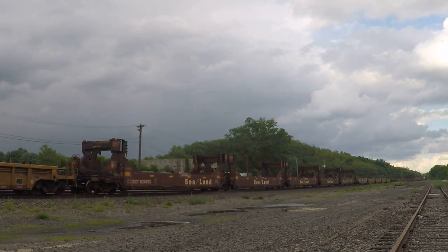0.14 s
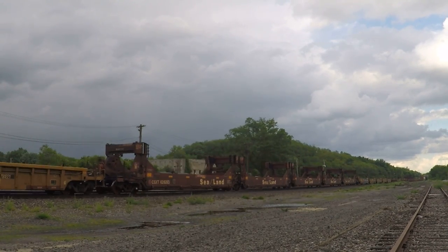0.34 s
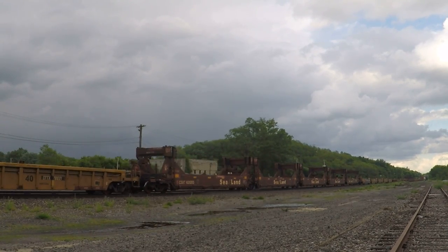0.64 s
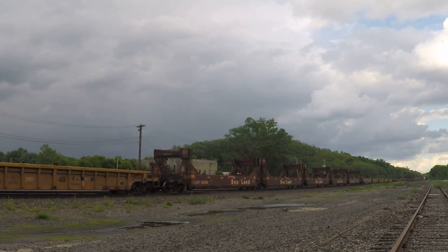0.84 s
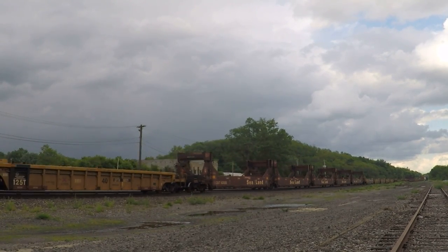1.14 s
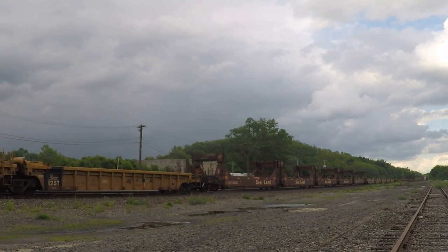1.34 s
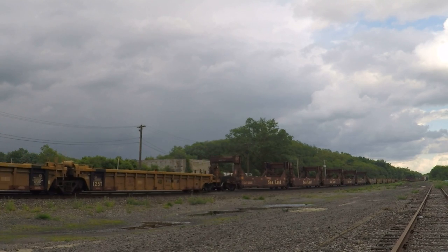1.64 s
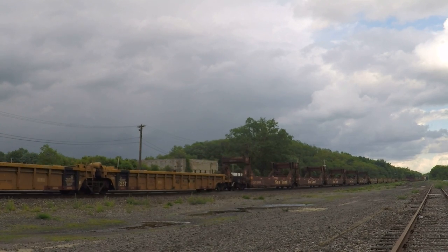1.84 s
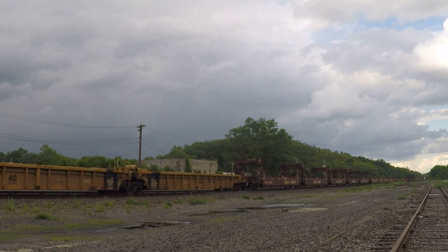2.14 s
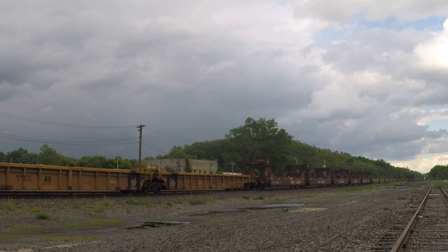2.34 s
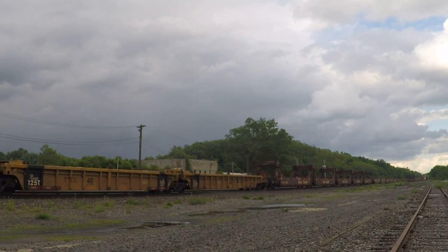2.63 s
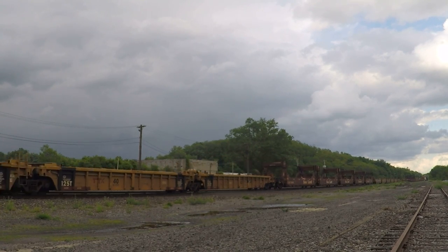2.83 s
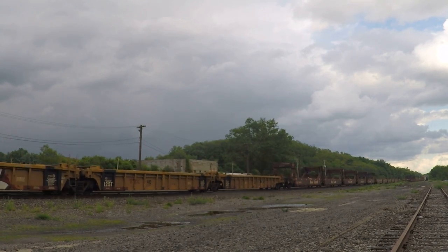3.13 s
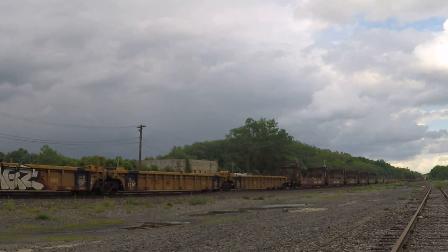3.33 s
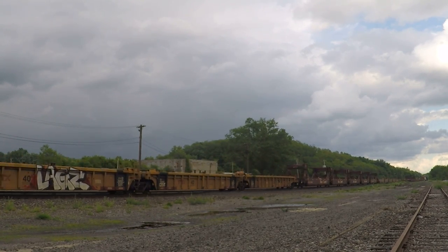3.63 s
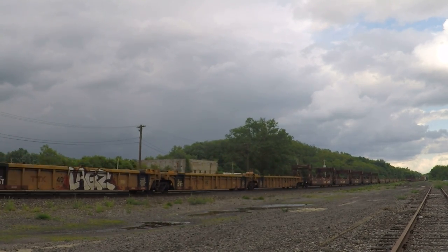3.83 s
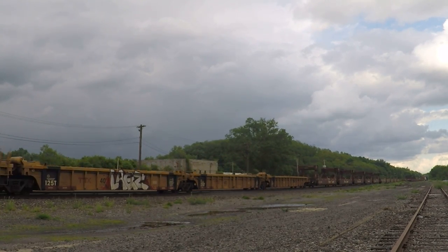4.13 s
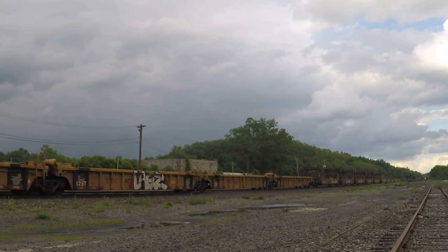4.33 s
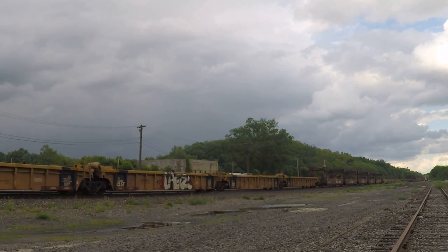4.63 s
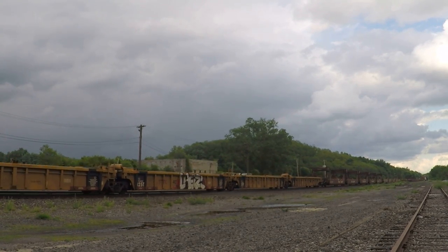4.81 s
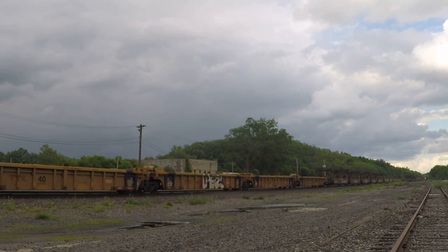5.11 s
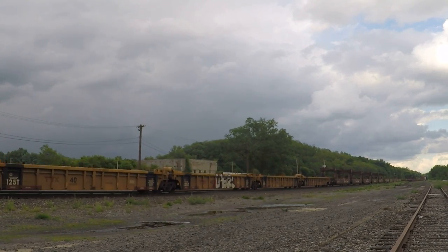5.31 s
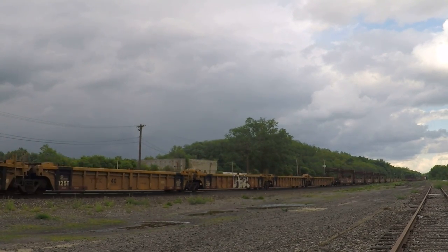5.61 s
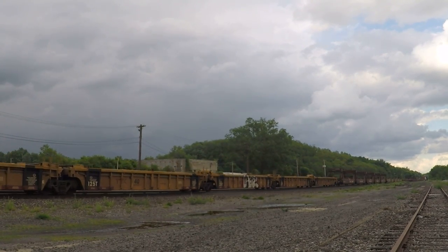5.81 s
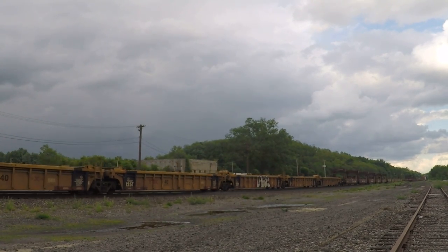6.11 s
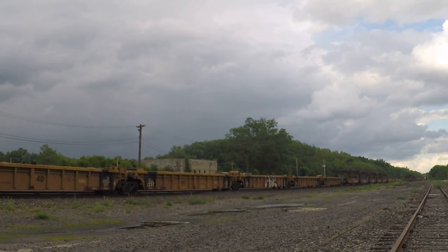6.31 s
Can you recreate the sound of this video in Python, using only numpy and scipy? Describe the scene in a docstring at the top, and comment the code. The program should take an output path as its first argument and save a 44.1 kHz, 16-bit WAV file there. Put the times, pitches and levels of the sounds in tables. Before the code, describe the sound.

A passing freight train rumbles and sings on its rails, clanking over joints, squeaking once per wheel turn, with deep wind buffets and hollow booms.

```python
"""A freight train of empty cars rolls past across an open gravel yard.
From the start the bodies rumble, wheels hiss and sing as narrow resonances, and struck steel modes clank.
From 0.7 s one wheel squeaks once a turn, every 1.4 s, as gliding tones with an octave in a noisy scrape.
At 2.1 s a gust surges: shaped noise and decaying swings thud on the microphone, and recur later.
From 4 s the clanks return, hardest at 4.7 s; the panel drone swells and low booms cluster near 5.6 s."""
import sys
import numpy as np
from scipy import signal
from scipy.fft import rfft, irfft
from scipy.io import wavfile

SR = 44100
rng = np.random.default_rng(int(sys.argv[2]) if len(sys.argv) > 2 else 0)


def waveform_to_disk(signal):
    """Save audio, clipped to [-1, 1], as 16-bit WAV at the path in sys.argv[1]."""
    frames = np.transpose(np.atleast_2d(signal))
    scaled = np.clip(frames, -1, 1) * 32767
    samples = np.round(scaled).astype(np.int16)
    wavfile.write(sys.argv[1], SR, samples)


N = 284886


def from_db(db):
    """dB to gain."""
    return 10 ** (np.asarray(db) / 20)


def rms_one(x):
    """Scaled to rms 1."""
    return x / np.sqrt(np.mean(x ** 2) + 1e-20)


def level_curve(rows):
    """Breakpoints (time_s, level_db) as one level per sample."""
    time_s, level_db = np.transpose(rows)
    return np.interp(np.arange(N) / SR, time_s, level_db)


def bump(centre_s, half_width_s):
    """Gaussian swell of height 1, down to 1/e at the half width."""
    return np.exp(-((np.arange(N) / SR - centre_s) / half_width_s) ** 2)


def plateau(start_s, lasts_s):
    """Flat-topped swell of height 1 with soft edges."""
    half_s = lasts_s / 2
    return np.exp(-((np.arange(N) / SR - start_s - half_s) / half_s) ** 4)


def drift(rate_hz):
    """Slow chance with spread 1: noise through two equal poles, at every 40th sample."""
    r = np.exp(-80 * np.pi * rate_hz / SR)
    slow = signal.lfilter([1], [1, -2 * r, r * r], rng.standard_normal(N // 40 + 2002))
    slow = rms_one(slow[2000:])  # drop the run-in
    return np.interp(np.arange(N) / 40, np.arange(len(slow)), slow)


def coloured(spectrum):
    """Noise with a spectrum drawn over log frequency, rms 1."""
    hz, level_db = np.transpose(spectrum)
    grid_hz = np.arange(N // 2 + 1) * SR / N + 1
    shape_db = np.interp(np.log(grid_hz), np.log(hz), level_db, left=-90, right=-90)
    return rms_one(irfft(rfft(rng.standard_normal(N)) * from_db(shape_db), N))


def resonate(x, hz, width_hz):
    """One two-pole resonance with gain 1 on top."""
    r = np.exp(-np.pi * width_hz / SR)
    poles = [1, -2 * r * np.cos(2 * np.pi * hz / SR), r * r]
    return signal.lfilter([(1 - r * r) / 2, 0, (r * r - 1) / 2], poles, x)


def narrow_noise(hz, width_hz):
    """Noise twice through one resonance, rms 1."""
    once = resonate(rng.standard_normal(N), hz, width_hz)
    return rms_one(resonate(once, hz, width_hz))


def wavering_tone(hz, width_hz):
    """A tone that wanders in pitch and flutters in level, rms 1."""
    phase = 2 * np.pi * np.cumsum(hz + 0.12 * width_hz * drift(6)) / SR
    return rms_one(from_db(2 * drift(14)) * np.sin(phase))


def rumble():
    """Rough treads shake the empty bodies: low noise, two resonances that come and go, a panel drone."""
    # body rumble level: time_s, level_db
    shaking = [(0.0, -39), (1.04, -41.5), (2.05, -39.5), (2.19, -33.5), (2.25, -42), (2.36, -40),
               (3.97, -40.5), (4.75, -38.5), (5.42, -39), (5.58, -38), (5.65, -41.5), (6.46, -39.5)]
    # rumble spectrum: freq_hz, density_db (relative, per Hz)
    rumble_spectrum = [(110, 2), (160, 5), (250, -0.5), (315, 0), (400, -9.5), (480, -11.5), (600, -21.5),
                       (800, -60)]
    # car-body resonances: freq_hz, width_hz (each pass), level_db (re rumble noise)
    body_modes = [(196.6, 43.6, -8), (397.7, 48, -11)]
    # side-panel drone level: time_s, level_db
    drone_curve = [(0, -47.5), (1.1, -57.5), (1.6, -59), (2.65, -55), (2.76, -44), (2.9, -54), (3.05, -64),
                   (3.25, -48), (3.4, -44.5), (4.1, -47.5), (4.27, -48), (4.5, -41.5), (4.72, -42.5),
                   (4.98, -41.5), (5.25, -47.5), (5.6, -48.5), (6.0, -43), (6.46, -57)]

    panels = sum(from_db(db + 2.0 * drift(3.2)) * narrow_noise(hz, width_hz)
                 for hz, width_hz, db in body_modes)
    body = rms_one(coloured(rumble_spectrum) + panels)
    body_db = level_curve(shaking) + 1.5 * drift(6.2)
    drone_db = level_curve(drone_curve) + 1.5 * drift(3.4)
    return from_db(body_db) * body + from_db(drone_db) * narrow_noise(311.0, 89.0)


def floors():
    """Car floors drum deeply: low noise plus a resonance at 107 Hz."""
    # drumming level: time_s, level_db
    drumming = [(0.0, -46), (0.29, -31), (0.47, -43), (0.56, -26.5), (0.66, -43), (1.04, -38.5),
                (1.26, -49), (1.29, -36), (2.25, -32), (3.9, -39.5), (4.16, -26), (4.19, -37.5),
                (4.64, -30), (4.71, -38), (5.38, -37.5), (5.61, -27.5), (5.78, -33), (6.46, -38)]
    # drumming spectrum: freq_hz, density_db (relative, per Hz)
    floor_spectrum = [(45, -3.5), (72, -3.5), (105, 2.5), (125, -15.5), (170, -36)]
    drum = rms_one(coloured(floor_spectrum) + 0.6 * narrow_noise(107, 30))
    return from_db(level_curve(drumming) + drift(4.5)) * drum


def rolling():
    """Steel on steel hisses unevenly; wheel and rail resonances stand out of it."""
    # rolling hiss level: time_s, level_db
    roll = [(0.0, -50), (0.52, -51), (1.89, -51.5), (2.07, -50.5), (3.04, -50.5), (3.62, -52), (4.26, -50),
            (4.51, -52.5), (4.79, -51.5), (5.34, -49.5), (6.13, -51), (6.46, -50)]
    # hiss spectrum: freq_hz, density_db (relative, per Hz)
    hiss_spectrum = [(500, -3), (770, -3), (1100, 2.5), (1290, 1.5), (1700, 4), (2000, 1), (2070, -13),
                     (2150, 2), (2500, 1), (2790, 6.5), (2860, -9), (3050, -3), (3140, 4), (3250, 4),
                     (3900, 1.5), (4120, -5), (5400, -11), (6400, -14), (8500, -26.5)]
    # resonances that swell as a car passes: freq_hz, width_hz, level_db, peak_s, half_width_s
    singing = [(1110, 110, -62, .3, .6), (1120, 110, -64, 3.5, 2.5), (1445, 60, -60, 1.9, .9),
               (1420, 120, -61, 5.3, 1.2), (1545, 60, -62, .7, .7), (1450, 90, -62, .5, .7),
               (1970, 70, -62, .6, 1.2), (2070, 90, -64, 5, 2), (1900, 60, -63, 2.6, .5),
               (2380, 100, -63, 4.95, .4), (2380, 200, -62, 3.5, 2), (2710, 60, -62, 6.2, .5),
               (3240, 130, -55.5, .06, .16), (3230, 90, -60, 1.8, .7), (3420, 160, -61, 5.5, .8),
               (3720, 150, -60, 4.5, 1.5), (4420, 200, -70, 2, 4), (1777, 20, -58, 5.42, .2),
               (1777, 20, -64, 5.85, .3), (1777, 25, -64, 4.85, .1), (2912, 18, -61, 5.27, .12),
               (3735, 28, -62, 4.3, .25), (3735, 40, -63, 3.95, .2), (1447, 30, -61, 1.55, .1),
               (3880, 130, -62, .6, 1), (5020, 20, -76, 2.2, .25), (2710, 25, -59.5, .55, .3),
               (2575, 25, -59, 2.87, .08), (2765, 30, -61, 3.25, .08), (2720, 30, -59, 3.38, .06),
               (2740, 30, -60, 3.08, .04), (2710, 40, -62, 4.1, .25), (2912, 18, -61, 5.7, .12),
               (2700, 25, -62, 5.55, .12), (3440, 25, -63, 4.66, .12), (3200, 30, -62, 6.36, .1),
               (3215, 40, -60, 5.13, .08), (3030, 120, -65, 3.8, .6), (3200, 30, -61, 2.9, .1),
               (3250, 25, -64, 1.62, .15), (3740, 30, -63, 3.05, .12), (3195, 50, -62, 2.7, .5),
               (2790, 40, -63, 2.25, .25), (3260, 80, -61, .8, .6), (3250, 30, -58, .07, .1),
               (3275, 25, -62, .45, .12), (2930, 250, -60.5, 5.6, 1.5), (2740, 70, -60, 3.2, .3),
               (1440, 90, -63, 3, .8), (2750, 30, -59, 1.68, .03), (2750, 30, -57.5, 1.84, .035),
               (2750, 40, -62, 1.52, .08), (2705, 16, -57.5, 3.17, .1), (3820, 25, -62, 4.4, .12),
               (3160, 40, -63, 5.28, .12)]
    # thin wheel modes that light up at random: freq_hz
    wheel_hz = [4360, 4420, 4480, 4650, 4870, 4950, 5040, 5200, 5260, 5530, 5650, 5930, 6080, 6260, 6400,
                6680, 6950, 7150]
    tone_under_hz = 32  # narrower resonances sing as a wavering tone

    roll_db = level_curve(roll)
    out = from_db(roll_db + 0.68 * drift(14.4) + 0.74 * drift(58)) * coloured(hiss_spectrum)
    for hz, width_hz, db, peak_s, half_width_s in singing:
        voice = wavering_tone if width_hz < tone_under_hz else narrow_noise
        flicker_db = 2.0 * min(half_width_s, 1) * drift(3.7)
        out += from_db(db + flicker_db) * bump(peak_s, half_width_s) * voice(hz, width_hz)

    hiss_hz, hiss_db = np.transpose(hiss_spectrum)
    for hz in wheel_hz:  # each follows the hiss level around it
        level_db = roll_db - 20 + np.interp(hz, hiss_hz, hiss_db) + 4 * drift(2.5)
        out += from_db(level_db) * narrow_noise(hz, 36)
    return out


def clanks():
    """Wheels over joints: each blow is uneven knocks into the steel's modes plus a dry noise crack."""
    # blows: start_s, level_db (before 6 dB trim), mid_db (500-900 Hz modes), lean_db (towards 717 Hz),
    # bright_db (modes over 900 Hz), top_db (extra over 2200 Hz), t60_s (scaled per mode and for the crack)
    blows = [(.177, -32, -4, 6, -2, -10, 0.11), (.529, -36, -4.5, -12.5, -10, -2, 0.033),
             (0.855, -42, -1, 0, -12, 0, 0.046), (1.17, -38, -3, 4.5, 0, -3, 0.067),
             (1.328, -52, -1, 14, -8, 0, .05), (2.144, -32, 1, -7, -5, -8, 0.031),
             (2.181, -41, -1, -10, -18, 0, 0.058), (2.522, -33.5, -2, -10, -28, 0, 0.047),
             (2.742, -40, 2, -4, -8, 0, 0.053), (4.085, -43, -3, -1, 4, -1, 0.36),
             (4.131, -45, -3, 3, 7, 0, 0.1), (4.7, -22.5, -6, 2, -3, 0, 0.06),
             (5.515, -53, -2, 8, -11, 2, 0.044), (5.557, -43, 0.5, 7.5, -11, 0, 0.1),
             (5.597, -45, 4, -8, -14, 3, 0.058), (5.62, -48, 7, 4, -17, 0, 0.046),
             (6.032, -30.5, -4, 9, 2.5, -7, 0.11), (6.304, -34, -4.5, 1, 3, -11, 0.084)]
    # modes of struck rail and truck: freq_hz, level_db, t60_share (ratio to the blow's)
    steel_modes = [(344, -4, 2.7), (429, 1.5, 0.7), (549, 0.5, 0.86), (717, -3.5, 0.61), (817, -15, 1.2),
                   (963, -11, 0.44), (1370, -31, 0.42), (1690, -11, 0.78), (1863, -12.5, 0.62),
                   (2090, -20, .8), (2295, -8.5, 0.76), (2440, -5, 0.47)]
    knock_decay_s, crack_hold_s, crack_attack_s = 0.005, 0.005, 0.001

    out, length = np.zeros(N + SR), SR // 3
    t = np.arange(length) / SR
    hz, mode_db, t60_share = np.transpose(steel_modes)[:, :, None]
    low = signal.butter(3, [420, 950], "band", fs=SR, output="sos")
    high = signal.butter(3, [900, 2530], "band", fs=SR, output="sos")
    lean = np.select([hz > 900, hz > 650, hz > 500], [0, 1, -1])
    for start_s, blow_db, mid_db, lean_db, bright_db, top_db, t60_s in blows:
        level_db = mode_db + bright_db * (hz > 900) + top_db * (hz > 2200)
        level_db = level_db + mid_db * ((hz > 500) & (hz <= 900)) + lean_db * lean
        level_db = level_db + rng.normal(0, 1.2, hz.shape)
        rings = from_db(level_db - 60 * t / (t60_s * t60_share)) * np.sin(2 * np.pi * hz * t)

        knocks = rng.standard_normal(900) * (rng.random(900) < 0.04)
        knocks *= np.exp(-t[:len(knocks)] / knock_decay_s)
        knocks[0] = 5
        struck = signal.fftconvolve(rings, knocks[None], axes=1)[:, :length]
        # the knocks share out each mode's energy
        energy_gain = np.linalg.norm(rings, axis=1) / np.linalg.norm(struck, axis=1)
        blow = (struck * energy_gain[:, None]).sum(axis=0)

        fade = from_db(-60 * np.maximum(t - crack_hold_s, 0) / (0.72 * t60_s))
        fade *= np.minimum(t / crack_attack_s, 1)
        grit = rng.standard_normal((2, length)) * fade
        dull, sharp = signal.sosfilt(low, grit[0]), signal.sosfilt(high, grit[1])
        crack = from_db(mid_db - 6.0) * dull / np.linalg.norm(dull)
        crack += from_db(bright_db - 10.0) * sharp / np.linalg.norm(sharp)
        crack *= np.linalg.norm(fade)

        first = round(start_s * SR)
        out[first:first + length] += from_db(blow_db - 6.0) * (blow + crack)
    distance = signal.butter(4, 3200, fs=SR, output="sos")  # distance dulls the blows
    return signal.sosfilt(distance, out[:N])


def squeaks():
    """A rubbing wheel sticks and slips once a turn, stepping up three modes that ring on amid scrape."""
    # squeaks: jump_s (to middle mode), low_lasts_s, low_db, middle_lasts_s, middle_db,
    # top_after_s (from jump to top note's centre), top_db, octave_db (re note), octave_accent_db (at jump);
    # note levels before a common trim
    turns = [(0.695, 0.042, -50, 0.022, -47, 0.054, -54.5, -21, 13),
             (2.101, 0.032, -51, 0.025, -55, .05, -77, -23, 12),
             (3.505, 0.049, -55, 0.022, -51.5, 0.04, -53, -12, 1),
             (4.908, 0.043, -50, 0.034, -51.5, .047, -54, -17, 16),
             (6.308, 0.029, -48.5, 0.027, -54, .05, -65, -24, 11)]
    low_hz, middle_hz, top_hz = 5945, 6125, 6380
    glide_s, jump_edge_s, top_lasts_s = 0.010, 0.0023, 0.0183
    ring_width_hz, ring_db = 22, -5
    tail_decay_s, tail_db = 0.11, -8.5

    out, t = np.zeros(N), np.arange(N) / SR
    flutter_db, waver_hz = 3 * drift(60), 18 * drift(70)
    scrape = narrow_noise(6030, 480) + from_db(-15) * narrow_noise(12400, 1200)
    tail_pole = np.exp(-1 / (tail_decay_s * SR))
    for (jump_s, low_lasts_s, low_db, middle_lasts_s, middle_db,
         top_after_s, top_db, octave_db, octave_accent_db) in turns:
        top_s = jump_s + top_after_s - top_lasts_s / 2
        hz = np.interp(t, [jump_s - glide_s, jump_s + jump_edge_s, top_s - jump_edge_s, top_s + jump_edge_s],
                       [low_hz, middle_hz, middle_hz, top_hz])
        phase = 2 * np.pi * np.cumsum(hz + waver_hz) / SR
        swell = from_db(low_db) * plateau(jump_s - low_lasts_s, low_lasts_s + jump_edge_s)
        swell += from_db(middle_db) * plateau(jump_s - jump_edge_s, middle_lasts_s + jump_edge_s)
        swell += from_db(top_db) * plateau(top_s, top_lasts_s)

        octave_level_db = octave_db + octave_accent_db * bump(jump_s, 0.012) + 3 * drift(120)
        octave_level_db += 8 * bump(jump_s + top_after_s - 0.004, 0.006)  # stronger on the top note
        voice = np.sin(phase) + from_db(octave_level_db) * np.sin(2 * phase)
        note = np.sqrt(2) * swell * from_db(flutter_db - 9.5) * voice
        # just after the jump the top mode is touched briefly
        touch = 2 * np.pi * (top_hz + 60) * t
        touch_swell = from_db(middle_db - 11.5) * bump(jump_s + 0.006, 0.004)
        note += touch_swell * (np.sin(touch) + 0.5 * np.sin(2 * touch))

        ringing = sum(resonate(note + 1e-18, mode_hz, ring_width_hz)
                      for mode_hz in (low_hz, middle_hz, top_hz))
        tail = signal.lfilter([1 - tail_pole], [1, -tail_pole], swell)
        out += note + from_db(ring_db) * ringing
        out += (from_db(-15) * swell + from_db(tail_db) * tail) * scrape
    return out


def chirps():
    """Single wheel modes sound short, slightly fluttering sine notes."""
    # chirps: centre_s, pitch_hz, level_db, half_width_s
    notes = [(1.15, 6850, -68, .018), (2.53, 6835, -59, .016), (3.952, 6840, -54, .014),
             (1.905, 8650, -69, .02), (1.55, 5590, -73, .03), (4.35, 5590, -63, .04),
             (5.76, 5590, -72, .03), (4.652, 850, -52, .012), (4.955, 6820, -66, .014),
             (3.532, 6750, -67, .008), (3.598, 6300, -65, .015), (2.24, 5950, -70, .02),
             (3.64, 5960, -67, .015), (2.27, 5660, -72, .04)]
    out, t = np.zeros(N), np.arange(N) / SR
    flutter_db = 0.9 * drift(60)
    for centre_s, hz, db, half_width_s in notes:
        swell = from_db(db + flutter_db) * bump(centre_s, half_width_s)
        out += np.sqrt(2) * swell * np.sin(2 * np.pi * hz * t)
    return out


def booms():
    """Panels boom briefly after a jolt: short swells of a slightly unsteady tone."""
    # booms: centre_s, pitch_hz, level_db (rms at the peak), half_width_s
    jolts = [(2.212, 392, -38, 0.012), (2.76, 311, -42, 0.017), (2.03, 100, -38, .04),
             (2.77, 405, -49, 0.017), (3.28, 113.5, -34, 0.058), (3.524, 101.1, -32, 0.049),
             (4.534, 54.3, -29, 0.085), (3.048, 310, -39.5, 0.033), (4.264, 326.2, -35, 0.018),
             (4.497, 375, -45, 0.053), (4.731, 330, -34.5, 0.016), (4.947, 318.6, -35, 0.026),
             (5.087, 309, -39.5, 0.0099), (5.138, 312, -37.5, 0.013), (5.52, 300, -46, 0.027),
             (5.526, 370, -42, .04), (5.552, 167, -32.5, 0.056), (5.542, 100, -25.5, 0.019),
             (5.587, 78, -24.5, 0.037), (5.632, 109.4, -22, 0.047), (5.714, 111.7, -32.5, 0.026),
             (6.0, 320, -45, 0.037), (6.236, 388.4, -46, 0.02)]
    t, waver_rad = np.arange(N) / SR, 0.4 * drift(14)
    return sum(np.sqrt(2) * from_db(db) * bump(centre_s, half_width_s) * np.sin(2 * np.pi * hz * t + waver_rad)
               for centre_s, hz, db, half_width_s in jolts)


def thuds():
    """The hardest wind buffets: pressure swings that build over most of a cycle and die away."""
    # buffets: start_s, level_db (before the swell and decay), pitch_hz
    buffets = [(0.74, -20, 33.8), (2.128, -10, 40.3), (2.163, -10.5, 37), (2.221, -14.5, 35.3),
               (2.309, -34, 39.6), (2.42, -9, 41), (2.456, -12.5, 38.5), (2.696, -9, 32),
               (2.838, -15.5, 33), (3.835, -13, 49), (4.063, -11.5, 51.3), (4.261, -19, 37),
               (4.491, -12, 45), (4.949, -21.5, 35.2), (6.036, -16.5, 65)]
    rise_cycles, decay_cycles = 0.82, 1.36
    out = np.zeros(N)
    for start_s, db, hz in buffets:
        cycles = np.maximum(np.arange(N) / SR - start_s, 0) * hz
        envelope = np.exp(-cycles / decay_cycles) * np.minimum(cycles / rise_cycles, 1)
        out += from_db(db) * envelope * np.sin(2 * np.pi * cycles)
    return out


def wind():
    """Gusts on the microphone: deep noise with a flickering level."""
    # gust level: time_s, level_db
    gusts = [(0, -42), (.7, -38.5), (2.05, -40.5), (2.15, -25), (2.55, -28.5), (2.85, -30.5), (3.0, -34),
             (3.7, -34), (3.85, -29), (4.6, -33), (4.72, -34), (5.6, -36.5), (5.85, -34), (6.46, -38.5)]
    # wind spectrum: freq_hz, density_db (relative, per Hz)
    wind_spectrum = [(15, -27), (28, 6), (45, -5), (65, -0.5), (110, -31.5), (250, -22.5)]
    return from_db(level_curve(gusts) + 2.3 * drift(6.2)) * coloured(wind_spectrum)


def mic_noise():
    """Microphone self-noise: steady faint hiss at a fixed level."""
    # self-noise spectrum: freq_hz, density_db (relative, per Hz)
    mic_noise_spectrum = [(3000, -1), (6000, -11), (9000, -1), (13000, -7), (15400, -6)]
    return from_db(-73) * coloured(mic_noise_spectrum)


def scene():
    """All sources at one microphone, with its self-noise."""
    train = rumble() + floors() + rolling() + clanks() + squeaks() + chirps() + booms()
    return (train + thuds() + wind() + mic_noise())[None]


def record(dry):
    """A steep elliptic low-pass cuts the top above 15.2 kHz."""
    return signal.sosfilt(signal.ellip(14, 0.5, 75, 15200, fs=SR, output="sos"), dry)


dry = scene()
out = record(dry)
waveform_to_disk(out)
```